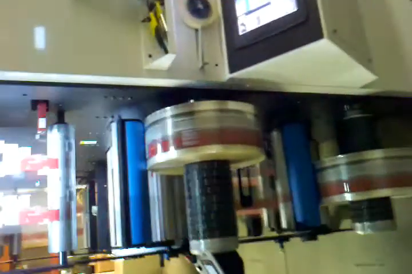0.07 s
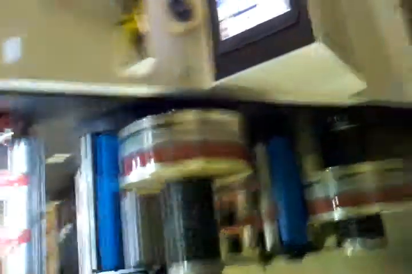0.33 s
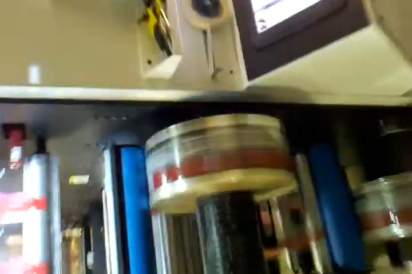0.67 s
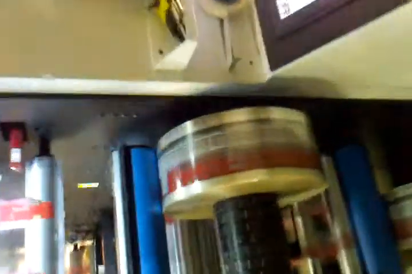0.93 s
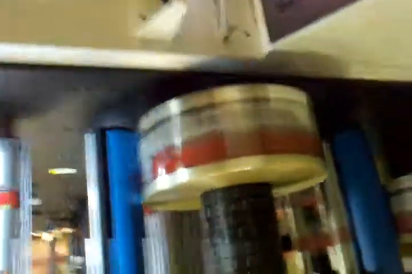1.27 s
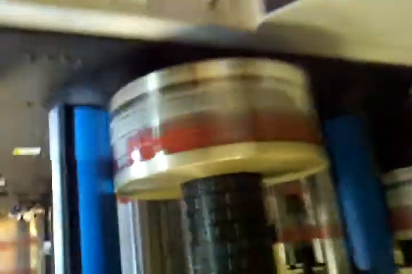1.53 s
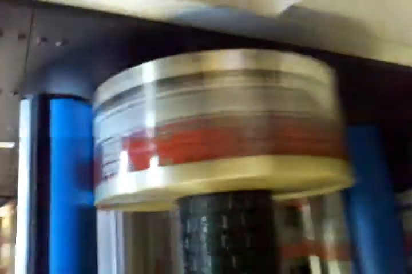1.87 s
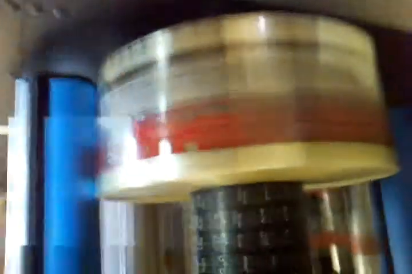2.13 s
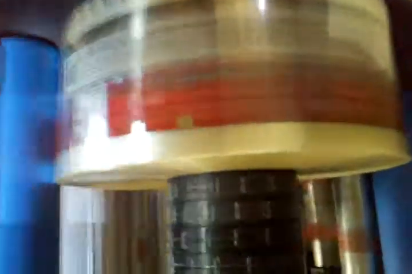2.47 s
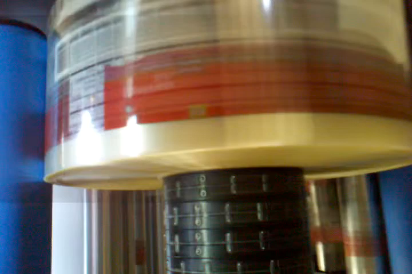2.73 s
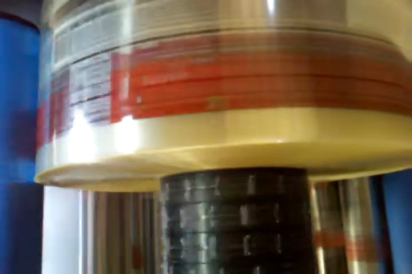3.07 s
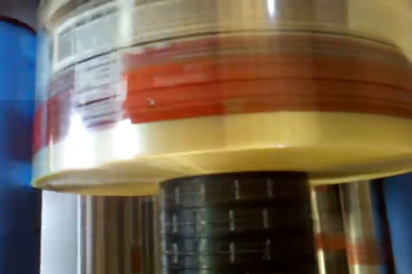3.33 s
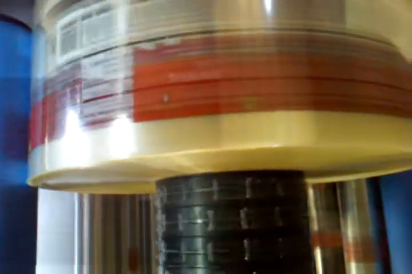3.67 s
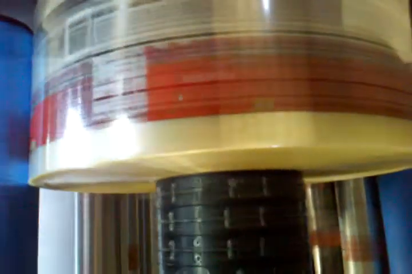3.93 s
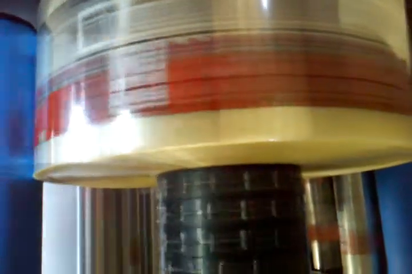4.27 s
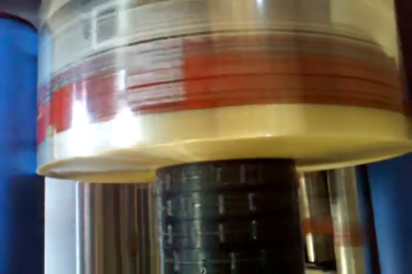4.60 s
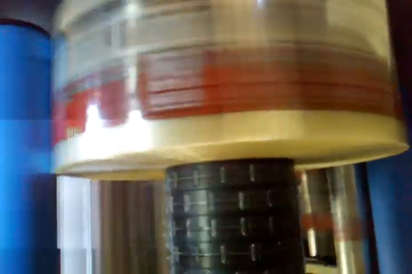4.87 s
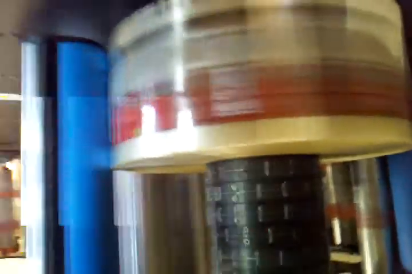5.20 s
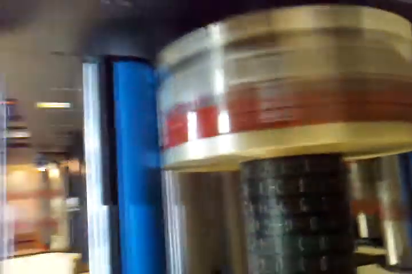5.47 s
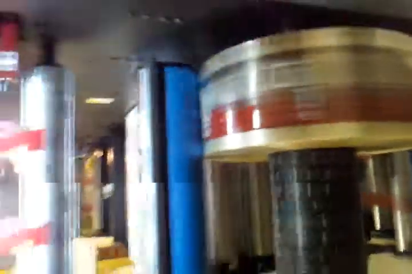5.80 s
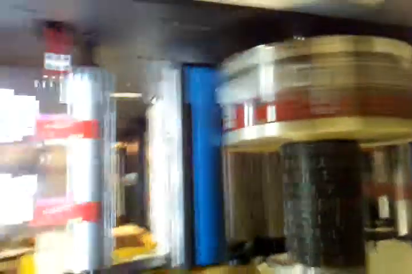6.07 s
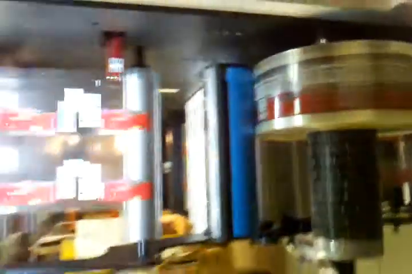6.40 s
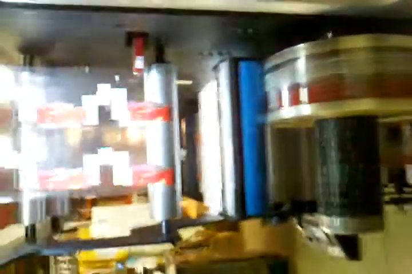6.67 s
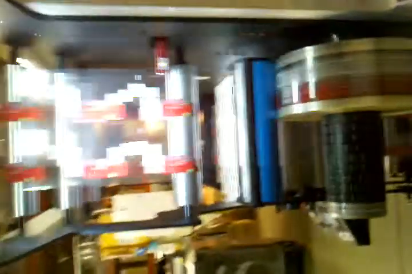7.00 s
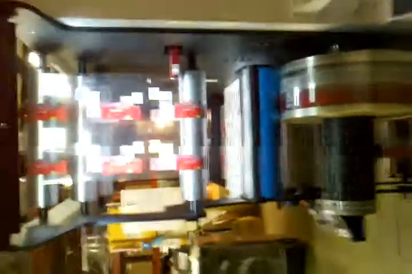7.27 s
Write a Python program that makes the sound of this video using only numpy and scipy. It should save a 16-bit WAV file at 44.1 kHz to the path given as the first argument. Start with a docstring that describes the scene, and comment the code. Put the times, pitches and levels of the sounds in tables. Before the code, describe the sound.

A large factory machine runs fast with a steady roar, hissing film, rapid metallic chatter and one early burst of air.

```python
"""Slitter rewinder in a factory hall

Rollers roar and running film hisses as broadband noise, two motors beat, and a jet of air escapes once.
Loose rings on the winding shaft chatter in every turn, tick and squeak: impact and friction excite them.
A handheld two-port microphone, which widens the stereo, moves in to the shaft and back."""
import sys
import numpy as np
from scipy import signal
from scipy.fft import rfft, irfft, next_fast_len
from scipy.io import wavfile

SR = 44100
rng = np.random.default_rng(int(sys.argv[2]) if len(sys.argv) > 2 else 0)


def waveform_to_disk(signal):
    """Save audio, clipped to [-1, 1], as 16-bit WAV at the path in sys.argv[1]."""
    frames = np.transpose(np.atleast_2d(signal))
    scaled = np.clip(frames, -1, 1) * 32767
    samples = np.round(scaled).astype(np.int16)
    wavfile.write(sys.argv[1], SR, samples)


N = 327663
TIME = np.arange(N) / SR
FREQ = np.maximum(np.arange(N // 2 + 1) * SR / N, 1)

# Noise spectra of the rollers, wound roll, frame, film, air jet and the jet's bright top.
# Each row: frequency in Hz, relative spectral density in dB.
ROLLER_SPECTRUM = [(20, -32), (42, -41), (58, -14), (80, -21.5), (110, -9), (155, -5), (205, 0.5),
                   (262, -1), (300, 0.5), (480, 0.4), (620, 1), (760, -10.5), (1100, -40)]
ROLL_SPECTRUM = [(450, -22), (660, -5), (700, 1), (740, 5.5), (770, 4.5), (810, 4.5), (850, 6.5), (885, 2),
                 (945, 5.5), (1010, -5.5), (1400, -30.5)]
FRAME_SPECTRUM = [(600, -21), (1000, 3), (1150, 5), (1350, 1), (1480, 5), (1650, -1.5), (2100, 0),
                  (2700, -5), (3300, -43), (4200, -4.5), (8000, -52)]
FILM_SPECTRUM = [(2000, -82), (3300, 11.5), (3900, 3.5), (4600, 0.5), (5700, 8.5), (6900, 4.5), (8100, 8.5),
                 (9300, 4.5), (10600, 2), (11400, 1), (14000, -1.5)]
JET_SPECTRUM = [(1500, -47), (2300, -3), (2900, -25), (3800, -2.5), (4600, -8), (5900, -1), (6400, 0),
                (7600, 2.5), (8300, 1), (8900, 6), (9400, -13), (11000, -16), (13700, -10.5)]
JET_TOP_SPECTRUM = [(5000, -35), (8000, -12), (9900, 11), (10700, 1), (12500, 2), (13400, 0), (13900, 5)]
# Strength of the roar, motor hum and gear whine at the moving microphone.
# Each row: time in seconds, relative level in dB.
ROAR_LEVELS = [(0, -26.5), (0.3, -26), (0.7, -29), (1.2, -27), (1.72, -25.5), (2.15, -29), (2.78, -26.5),
               (3.05, -27.5), (3.55, -27), (4.05, -26), (4.55, -27), (4.85, -27.5), (5.55, -27.5),
               (5.85, -28.5), (6.3, -28), (6.95, -27), (7.43, -28)]
HUM_LEVELS = [(0, -36.5), (0.3, -36), (0.75, -38), (0.95, -37), (1.25, -37.5), (1.6, -47), (2.15, -43),
              (2.5, -50), (3.5, -49), (4.05, -44), (4.55, -51), (5, -43.5), (5.7, -45), (6.1, -38),
              (6.55, -45), (6.97, -37.5), (7.43, -38)]
WHINE_LEVELS = [(0, -40), (0.6, -49.5), (1.1, -55), (1.5, -38.5), (2.15, -49), (2.4, -46), (3.7, -46.5),
                (4.55, -46.5), (5.8, -58), (6.7, -46), (7.43, -64)]
# The microphone's path to the shaft and back. Each row: time in seconds, closeness from 0 to 1.
MIC_PATH = [(1.2, 0), (2.8, 0.63), (4.7, 0.67), (6.0, 0.57), (7.43, 0.04)]
# Modes of the shaft rings. Each row: frequency in Hz, width in Hz, relative level in dB,
# port difference against port sum in dB, chatter decay time in seconds.
RING_MODES = [(2210, 930, 0, 0, 0.0075), (3530, 2300, -11, -16, 0.012), (3834, 250, -8.5, -14, 0.0055),
              (4520, 2800, -6.5, -5, 0.0011), (5783, 340, 0, -7, 0.019), (6050, 120, -4.5, -10, 0.015),
              (8055, 470, 0.5, 4, 0.0096), (8470, 150, -5, -7, 0.0034), (10570, 260, -6.5, 1.5, 0.0049),
              (12100, 270, -10, 8, 0.011)]
# Drops of the rings in each turn. Each row: position as a share of the turn, relative level in dB.
RING_DROPS = [(.22, 0.5), (0.451, 3.5), (.57, -3.5), (.79, 3.5), (.86, -0.5)]
# Hard clacks of the rings. Each row: time in seconds, drive of the low, middle and high modes in dB.
RING_CLACKS = [(0.102, -29, -37.0, -29), (0.228, -26, -38, -37), (0.296, -28.5, -27, -27),
               (1.02, -35, -31.0, -29.0), (1.086, -33, -39, -34.0), (1.319, -33.0, -35.0, -33),
               (1.616, -29.0, -29.0, -35), (1.679, -31, -35, -38.0), (1.715, -29, -27, -32),
               (1.736, -29, -28, -32), (1.863, -34, -24, -28.0), (1.878, -39.0, -26, -27.0),
               (2.004, -41, -29, -34.0), (2.035, -35, -33, -28), (2.071, -37, -24, -32.0),
               (2.209, -34, -43, -47), (2.337, -37.0, -30, -21.5), (2.376, -38.0, -27, -30.0),
               (2.396, -30.0, -36, -40), (2.455, -34.0, -39, -34.0), (2.514, -42, -41, -39),
               (2.658, -31, -41, -36), (2.776, -38, -39, -37), (2.81, -32, -35, -36),
               (2.97, -37.0, -37, -34), (3.105, -33, -33.0, -40), (3.205, -29, -33.0, -29),
               (3.346, -34.0, -26, -38.0), (3.405, -25.5, -29.0, -31), (3.527, -31.0, -32, -38),
               (3.652, -42, -36, -33.0), (3.704, -34, -34, -39), (3.8, -32.0, -35, -32),
               (3.977, -31, -38, -35.0), (4.006, -37, -31, -32.0), (4.075, -26, -26, -26),
               (4.103, -33, -29, -33.0), (4.243, -40, -33.0, -31), (4.311, -37, -23, -27),
               (4.486, -27, -36, -37.0), (4.549, -29.0, -25.0, -24), (4.571, -30.0, -31.0, -28),
               (4.858, -33.0, -27, -28.0), (4.873, -30, -36, -30), (4.995, -38, -32.0, -28),
               (5.055, -28, -42, -37.0), (5.175, -27, -42.0, -36), (5.262, -29, -27, -39),
               (5.302, -29.0, -25, -29), (5.45, -35.0, -29.0, -27.0), (5.545, -33.0, -33, -38.0),
               (5.614, -32.0, -45, -33.0), (5.654, -34, -27, -27), (5.745, -36, -33, -25.5),
               (5.812, -34, -41, -28), (5.884, -36, -39, -35.0), (5.9, -36, -41, -25.5),
               (5.994, -35.0, -41, -34), (6.011, -30, -43, -37), (6.047, -36, -26, -31),
               (6.062, -37, -29.0, -31), (6.246, -39, -40, -33), (6.26, -32.0, -36, -32),
               (6.4, -32, -47, -29), (6.491, -37, -44, -35), (6.696, -40, -44, -27.5),
               (6.85, -29, -38, -26), (7.001, -32, -34, -30), (7.116, -26.0, -26, -26),
               (7.424, -26, -35, -35.0)]
# Snaps of a ring against its stop. Each row: start in seconds, level in dB.
RING_TICKS = [(0.138, -16), (0.439, -19), (0.967, -22), (1.741, -17), (1.861, -14), (2.376, -24),
              (2.397, -22), (2.700, -19), (2.777, -18), (2.970, -25), (3.041, -20), (3.078, -19),
              (3.371, -22), (3.527, -20), (3.598, -18), (3.652, -19), (3.731, -16.5), (3.978, -15),
              (4.099, -16), (4.245, -20), (4.485, -15.5), (4.544, -14), (4.566, -20), (4.869, -12),
              (5.175, -18), (5.3, -26), (5.545, -27), (5.744, -25), (5.81, -23), (6.047, -20), (6.259, -27),
              (6.612, -23), (6.916, -26), (7.114, -23), (7.251, -21)]
# Modes of a tick. Each row: frequency in Hz, relative level in dB, decay time in seconds.
TICK_MODES = [(2080, -7.5, 0.0011), (3846, -3.5, 0.0029), (4680, -5, 0.0013), (10650, -22, 0.0033)]
# Slips of a sticking ring. Each row: time in seconds, relative level in dB.
RING_SQUEAKS = [(1.317, -33), (2.222, -30), (2.459, -30), (2.969, -25.5), (3.057, -23), (3.208, -25),
                (3.405, -23), (3.555, -25.5), (3.705, -27), (3.862, -22), (4.007, -25), (4.080, -30),
                (4.106, -23), (4.161, -22), (4.245, -26), (4.613, -27), (5.612, -34), (5.810, -30),
                (5.900, -35), (6.047, -25), (6.240, -35), (6.687, -35), (6.814, -27), (7.120, -31)]
# Wavering drive and gear tones. Each row: frequency in Hz, relative level in dB.
FAINT_TONES = [(59, -68), (239.6, -51), (321, -47.5), (328.4, -57), (344, -50.5), (359.3, -46.5),
               (532.9, -44.5), (737.5, -47), (837.1, -52), (1065.9, -51), (1146.6, -44.5), (1228.7, -52),
               (1269.1, -47), (1351.2, -47)]
# Firm drive tones. Each row: frequency in Hz, levels in dB at the start, midway and at the end.
FIRM_TONES = [(103.6, -51, -62.5, -51), (214.2, -49.5, -49, -45), (480, -60, -44.5, -45),
              (1397, -44, -50, -46.5)]
# Brief resonances in the roar.
# Each row: peak time in seconds, half length in seconds, frequency in Hz, peak level in dB.
ROAR_FLARES = [(1.52, 0.27, 320, -37), (1.55, .2, 450, -43), (2.77, 0.039, 820, -29), (4.35, .1, 336, -45),
               (4.5, 0.42, 833, -38), (6.7, 0.88, 280.4, -42.5)]
# Microphone's response to the port difference against the sum. Each row: frequency in Hz, gain in dB.
PORT_DIFFERENCE = [(30, -15), (100, -25.5), (200, -13.5), (400, -13.5), (800, -6), (1500, 1.5),
                   (2200, -0.5), (4000, 3), (5700, -1), (9000, -0.5), (14000, -2)]
# Treble cross-feed between the channels. Each row: frequency in Hz, gain in dB.
CROSS_FEED = [(4000, -2), (4400, -12.5), (5700, -2.5), (7400, -9), (14000, -16.5)]


def machine_roar(flutter_db=0.54, surge_s=7.0, surge_width_s=0.12, surge_db=2.5):
    """Broadband vibration: rollers rumble, the wound roll drones and the frame rings, swelling together."""
    surge = surge_db * bell(surge_s, surge_width_s)
    layers = [(ROLLER_SPECTRUM, -31.5 + surge, -.6, 1.1),
              (ROLL_SPECTRUM, -33, 2.6, .9),
              (FRAME_SPECTRUM, -31.5, -.8, .9)]
    return sum(noise(spectrum) * undb(db + close_db * near() + swell * swell_db() + flutter_db * walk(22))
               for spectrum, db, close_db, swell in layers)


def film_hiss(level_db=-30.5, close_db=0.5, swell=0.87, flicker_db=(1.8, 1.6, 1.3, 1.3, 1.2, 1)):
    """Modulated noise: film hisses over the rollers and swells with the roar; each band flickers alone."""
    hiss, out = noise(FILM_SPECTRUM), 0
    centres_hz = np.linspace(3000, 13000, 6)
    for weights, db in zip(np.eye(len(centres_hz)), flicker_db):
        band = shape(hiss, np.interp(FREQ, centres_hz, weights))
        out = out + band * undb(db * walk(45))
    dip_db = -1.5 * bell(2.21, 0.071)  # the hiss dips briefly
    return out * undb(level_db + close_db * near() + swell * swell_db() + dip_db)


def ring_chatter(turn_s=.1494, jitter_s=0.0046, drop_db=-35.5, scatter_db=3, mix_db=6, close_db=-1.5,
                 clack_hz=(2200, 5800, 8000), strike_db=17, bounces_per_s=4000):
    """Impact excitation: rings drop on the turning shaft, each contact driving their modes in a new mix."""
    shares, pattern_db = np.transpose(RING_DROPS)
    turns = np.arange(int(N / SR / turn_s) + 1)[:, None]
    times = ((turns + shares) * turn_s).ravel()
    chance = rng.standard_normal((len(times), 2 + len(RING_MODES))).T
    times = times + jitter_s * chance[0]
    scatter, *mode_mixes = np.minimum(chance[1:], .5)  # the play of a ring limits its fall
    drops_db = np.resize(pattern_db, len(times)) + drop_db + scatter_db * scatter
    drops_db += close_db * np.interp(times, TIME, near())
    clack_times = np.transpose(RING_CLACKS)[0]
    bounces = rng.random(N) < bounces_per_s / SR
    impacts = unit(bounces * np.sign(rng.standard_normal((2, N))))
    impacts[0, (clack_times * SR).astype(int)] += undb(strike_db)  # one clean strike in each clack
    out = 0
    for (hz, width, db, side_db, fall_s), mix in zip(RING_MODES, mode_mixes):
        drops = contact_force(times, drops_db + mix_db * mix, 0.84 * fall_s, fall_s)
        clacks_db = [np.interp(hz, clack_hz, levels) for _, *levels in RING_CLACKS]
        clacks = contact_force(clack_times, clacks_db, 0.73 * fall_s, fall_s)
        ringing = shape(impacts * np.hypot(drops, clacks), resonance(hz, width))
        out = out + undb(db) * unit(undb([[0], [side_db]])) * ringing
    return out


def contact_force(times, levels_db, rise_s, fall_s):
    """Incoherent addition: contacts, each building and dying exponentially, sum in power to one envelope."""
    total = np.zeros(N)
    lag = np.arange(-700, 1800)  # samples from the peak
    power = np.exp(np.where(lag < 0, lag / rise_s, -lag / fall_s) * 2 / SR)
    for s, gain in zip(times, undb(levels_db)):
        total[np.clip(int(s * SR) + lag, 0, N - 1)] += gain ** 2 * power
    return np.sqrt(total)


def ring_ticks(side_db=-4, crack_db=-4, crack_s=0.001, detune=0.024, mix_db=1.5):
    """Damped free vibration: a ring hits its stop with a crack and sounds briefly, never twice alike."""
    out, age = np.zeros((2, N + SR)), TIME[:SR // 20]
    hz, modes_db, decay_s = np.transpose(TICK_MODES)[:, :, None]
    for s, db in RING_TICKS:
        tuning, mix = rng.standard_normal((2, len(TICK_MODES), 1))
        envelopes = undb(modes_db + mix_db * mix) * np.exp(-age / decay_s)
        modes = envelopes * np.sin(2 * np.pi * hz * (1 + detune * tuning) * age)
        crack = undb(crack_db) * np.exp(-age / crack_s) * rng.standard_normal((2, len(age)))
        out[:, int(s * SR) + np.arange(len(age))] += undb(db) * (modes.sum(0) + crack)
    return out[:, :N] * undb([[0], [side_db]])


def ring_squeaks(gain_db=2.5, mid_db=-7, pitch_hz=5740, drift_hz=110, rough_hz=260):
    """Stick-slip friction: each slip of a ring sings for a few milliseconds on one rough note."""
    times, db = np.transpose(RING_SQUEAKS)
    phase = 2 * np.pi * np.cumsum(pitch_hz + drift_hz * walk(25) + rough_hz * walk(2000)) / SR
    note = np.sqrt(2) * np.array([undb(mid_db) * np.cos(phase), np.sin(phase)])
    return note * contact_force(times, db + gain_db, rise_s=0.0043, fall_s=.006)


def air_jet(opens_s=0.444, shuts_s=1.136, attack_s=0.039, hold_s=0.11, release_s=.08,
            level_db=-22, top_db=-2.5, sag_db_per_s=12.5):
    """Turbulence: compressed air hisses from a valve; the bright top fades first as the pressure falls."""
    age = TIME - opens_s
    valve = np.clip(age / attack_s, 0, 1) * np.exp(-np.maximum(TIME - shuts_s, 0) / release_s)
    pressure = valve * undb(-sag_db_per_s * np.maximum(age - attack_s - hold_s, 0))
    hiss = noise(JET_SPECTRUM) + undb(top_db) * pressure ** 2 * noise(JET_TOP_SPECTRUM)
    return hiss * pressure * undb(level_db)


def drive_tone(hz, wander_hz, waver_db):
    """Periodic vibration: pitch follows a drive's wandering speed; the hall shifts phase and strength."""
    phase = 2 * np.pi * np.cumsum(hz + wander_hz * walk(5)) / SR
    phases = (phase + rng.uniform(0, 2 * np.pi, (2, 1))).astype(np.float32)
    return np.sqrt(2) * np.sin(phases) * undb(waver_db * walk(2.557))


def drive_train():
    """Superposition: motors and gears give many faint wavering tones and a few firm ones."""
    faint = sum(undb(db - 3) * drive_tone(hz, wander_hz=1.735, waver_db=2.5) for hz, db in FAINT_TONES)
    path_s = np.linspace(0, N / SR, 3)
    firm = sum(undb(np.interp(TIME, path_s, levels)) * drive_tone(hz, wander_hz=0.79, waver_db=0)
               for hz, *levels in FIRM_TONES)
    return faint + firm


def motor_hum(hz=376, beat_hz=2.238, beat_peak_s=.28, second_motor_db=-10, side_db=-37):
    """Beating: two motors differ slightly in speed, and the microphone crosses their standing wave."""
    beat = abs(1 + undb(second_motor_db) * np.exp(2j * np.pi * beat_hz * (TIME - beat_peak_s)))
    standing_wave = undb([curve(HUM_LEVELS), np.full(N, side_db)])  # only the port sum follows the path
    return beat * drive_tone(hz, wander_hz=.4, waver_db=.3) * standing_wave


def gear_whine(hz=1488.5, gain_db=1):
    """Standing wave: the tone of the gears swells and fades as the microphone moves through the hall."""
    return undb(curve(WHINE_LEVELS) + gain_db) * drive_tone(hz, wander_hz=1.223, waver_db=0.7)


def roar_flares(relative_width=0.087):
    """Resonance: single narrow bands of the roar swell and fade."""
    out = 0
    for peak_s, half_s, hz, db in ROAR_FLARES:
        band = unit(shape(rng.standard_normal((2, N)), resonance(hz, relative_width * hz)))
        out = out + band * undb(db) * bell(peak_s, half_s)
    return out


def hall(direct, t60_s=0.61, wet_db=-13):
    """Reverberation: reflections from the machine's panels and the hall add a diffuse, decaying tail."""
    age = TIME[:SR]
    tail = rng.standard_normal((2, SR)) * undb(-60 * age / t60_s) * (age > .004)
    tail = tail / np.sqrt(np.sum(tail ** 2) / 2)
    return direct + undb(wet_db) * signal.fftconvolve(direct, tail, axes=1)[:, :N]


def microphone(sound, delay_s=15 / SR, full_feed_below_hz=4000, far_pan_db=-0.26):
    """Comb filtering: each channel subtracts the other port, delayed; mid and side notches interleave."""
    depth = np.where(FREQ < full_feed_below_hz, 1, np.minimum(colour(CROSS_FEED), 1))
    feed = depth * np.exp(-2j * np.pi * FREQ * delay_s)
    mid_gain, side_gain = 1 - feed, (1 + feed) * colour(PORT_DIFFERENCE)
    total = np.hypot(abs(mid_gain), abs(side_gain))  # equalises to an even response
    mid, side = shape(sound[0], mid_gain / total), shape(sound[1], side_gain / total)
    pan_db = far_pan_db * (1 - near())  # left minus right, nearer the centre when close
    return np.array([mid + side, mid - side]) * undb(np.array([pan_db, -pan_db]) / 2)


def undb(db):
    """Amplitude ratio of a level in decibels."""
    return np.exp(np.asarray(db) * (np.log(10) / 20))


def unit(x):
    """Normalisation to an rms of 1."""
    return x / np.sqrt(np.mean(x ** 2))


def curve(table):
    """Linear interpolation of a time table at every sample."""
    return np.interp(TIME, *np.transpose(table))


def swell_db():
    """Level of the roar relative to its mean."""
    db = curve(ROAR_LEVELS)
    return db - db.mean()


def near():
    """Proximity of the microphone to the shaft at every sample."""
    return curve(MIC_PATH)


def bell(peak_s, half_s):
    """Gaussian envelope, down to 1/e at half_s either side of its peak."""
    return np.exp(-((TIME - peak_s) / half_s) ** 2)


def walk(knots_per_s):
    """Random modulation: a continuous drift with an rms of 1."""
    knots = rng.standard_normal(2048)
    return unit(np.interp(TIME * knots_per_s, np.arange(len(knots)), knots))


def colour(points):
    """Frequency response through (Hz, dB) points on a logarithmic frequency axis."""
    hz, db = np.transpose(points)
    return undb(np.interp(np.log(FREQ), np.log(hz), db))


def shape(x, response):
    """Linear filtering: the spectrum is multiplied by a frequency response."""
    size = next_fast_len(N, True)
    bins_hz = np.arange(size // 2 + 1) * SR / size
    return irfft(rfft(x, size) * np.interp(bins_hz, FREQ, response), size)[..., :N]


def resonance(hz, width_hz):
    """Two resonators in cascade: a mode with steep skirts that keeps the power of white noise."""
    mode = 1 / (1 + 1j * ((FREQ ** 2 - hz ** 2) / (FREQ * width_hz))) ** 2
    return mode / np.sqrt(np.mean(abs(mode) ** 2))


def noise(spectrum):
    """Uncorrelated coloured noise for the sum (mid) and difference (side) of the ports."""
    return unit(shape(rng.standard_normal((2, N)), colour(spectrum)))


def scene():
    """Superposition: all sources add as mid and side, which the microphone turns into left and right."""
    machine = machine_roar() + roar_flares() + drive_train() + motor_hum() + gear_whine()
    hiss = film_hiss() + air_jet()
    rings = ring_chatter() + ring_ticks() + ring_squeaks()
    return microphone(machine + hiss + hall(rings))


def record(dry, cutoff_hz=13950):
    """Band limiting: a steep low-pass filter removes the highest treble."""
    return signal.sosfilt(signal.ellip(12, .2, 80, cutoff_hz, fs=SR, output="sos"), dry)


dry = scene()
out = record(dry)
waveform_to_disk(out)
```